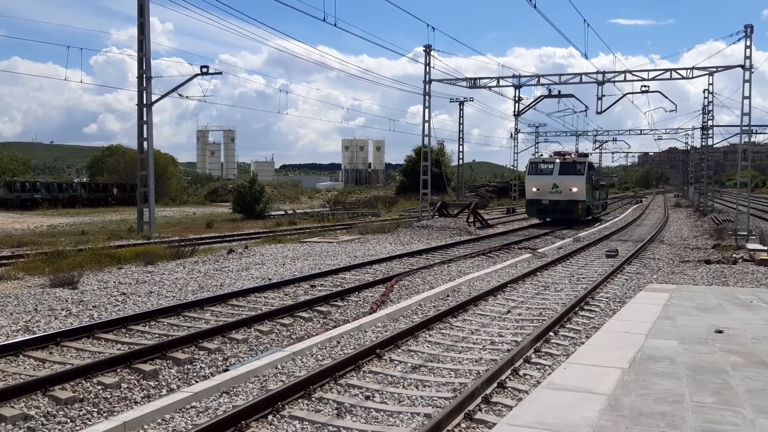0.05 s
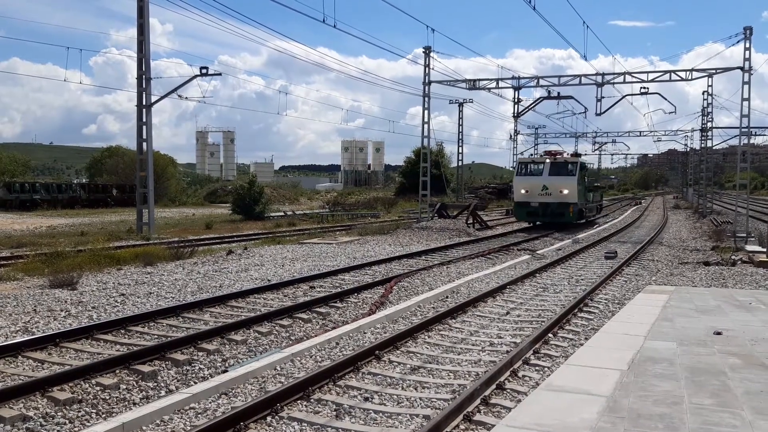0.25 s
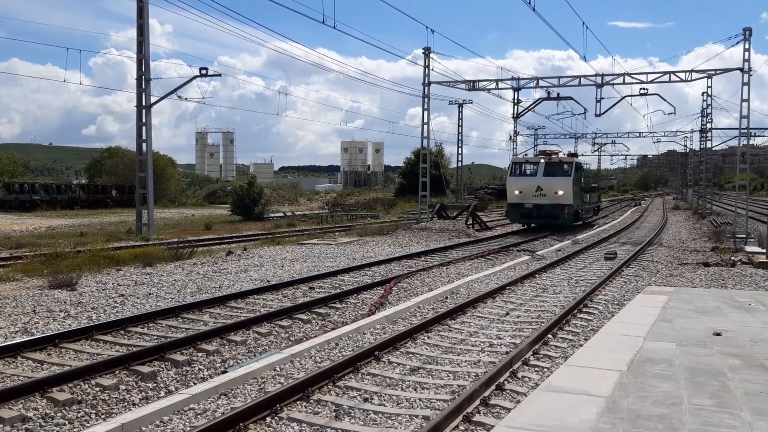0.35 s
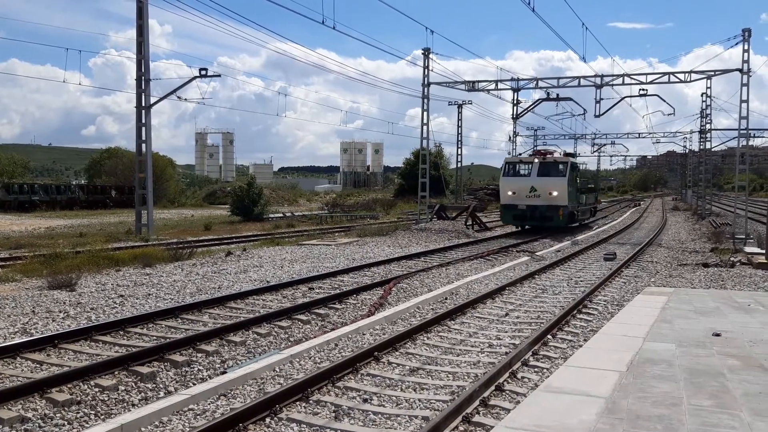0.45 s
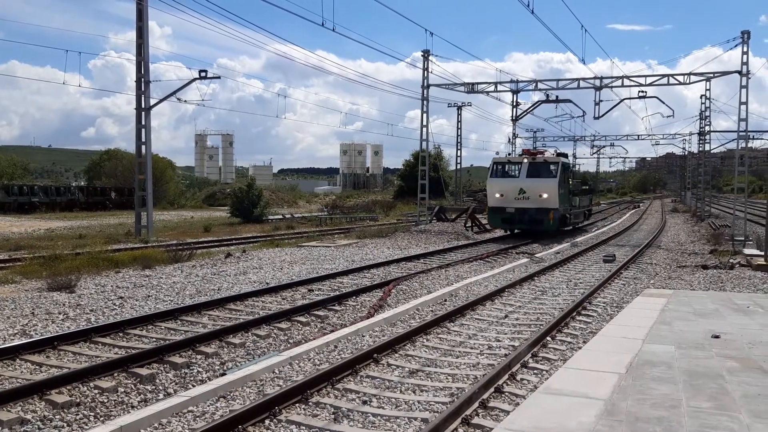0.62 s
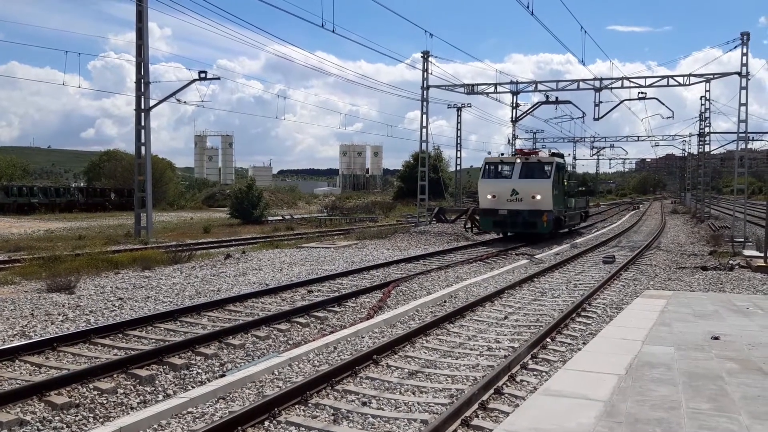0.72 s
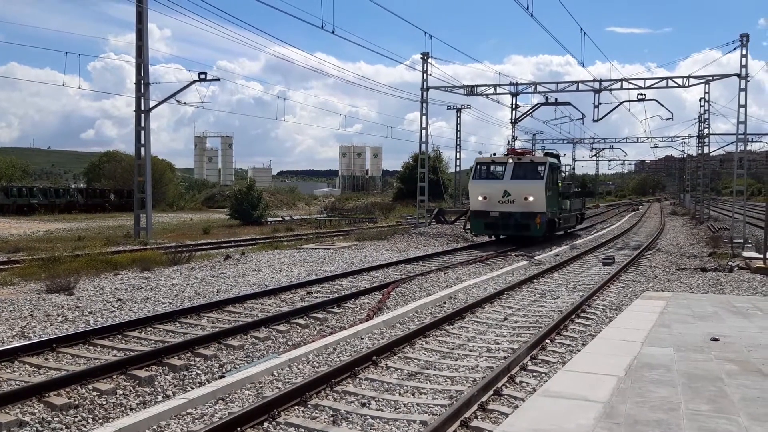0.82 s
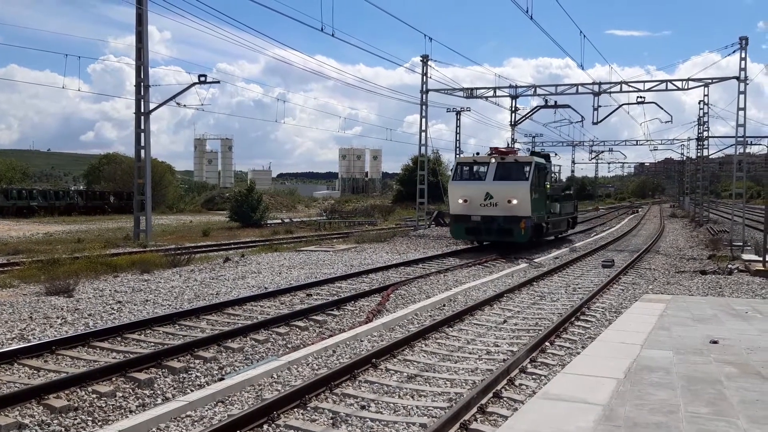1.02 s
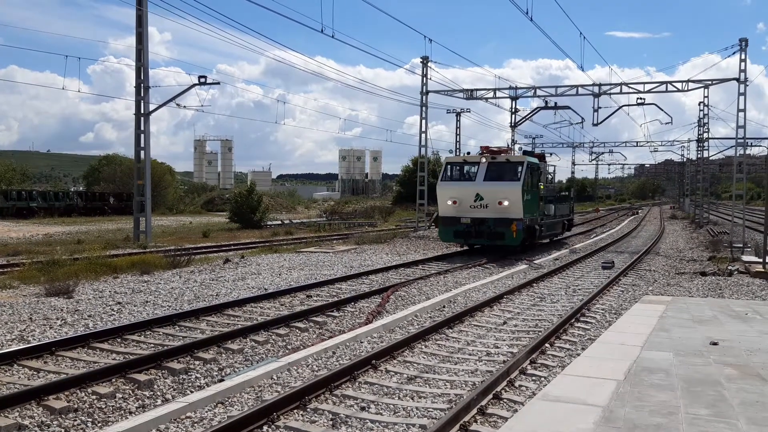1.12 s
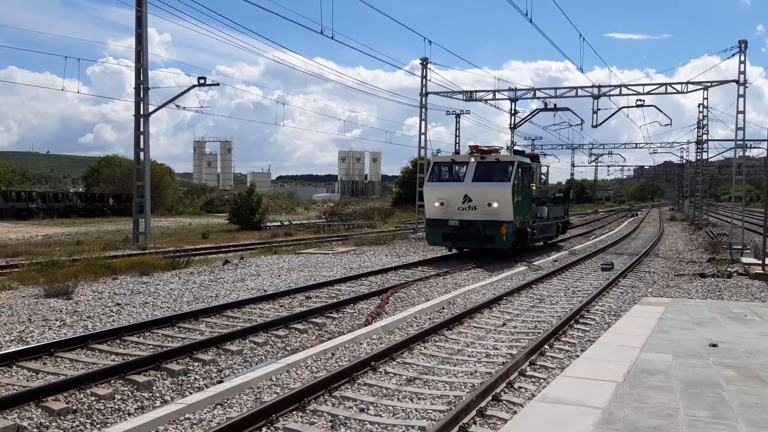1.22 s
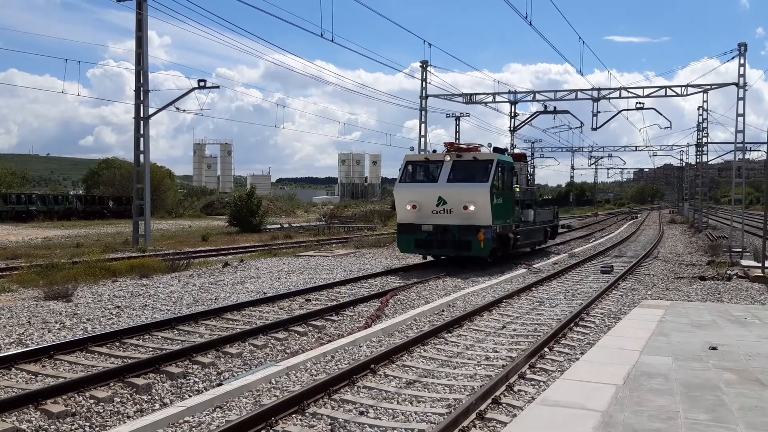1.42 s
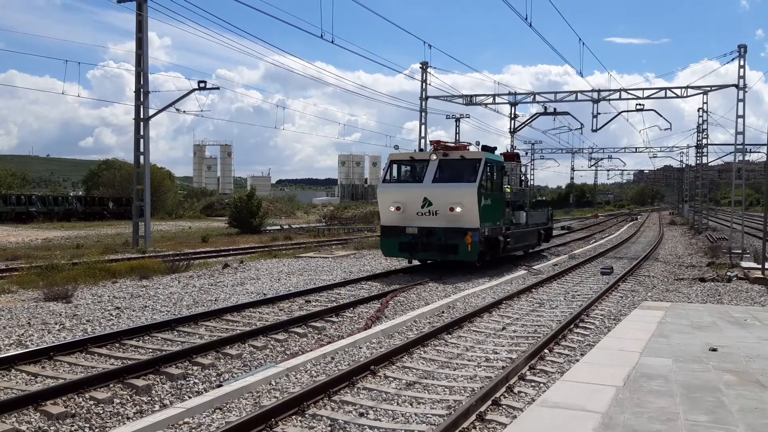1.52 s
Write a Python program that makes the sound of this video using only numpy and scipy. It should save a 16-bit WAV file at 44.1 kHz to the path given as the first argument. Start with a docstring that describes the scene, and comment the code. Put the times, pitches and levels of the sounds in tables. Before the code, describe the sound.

A rail vehicle's air horn gives one loud, high blast from about 0.2 to 0.6 seconds, turning duller as it ends. Its echo fades across the open yard over the following second. Throughout, a faint diesel throb and the hiss of wheels on rails grow slightly as the vehicle approaches. Low wind gusts buffet the microphone, mostly from 0.7 to 1.2 seconds, with a dull bump near 1.1 seconds.

```python
"""One short air-horn blast from a small diesel rail vehicle approaching across an open yard.
The horn turns dull and slightly sharp as its air runs out, and echoes round the yard, where an
earlier blast is still dying away. Behind it the engine throbs and the wheels hiss on the rails.
Gusts buffet the stereo microphone, and the recorder's gain ducks under the horn."""
import sys
import numpy as np
from scipy import signal
from scipy.fft import rfft, irfft
from scipy.io import wavfile
from scipy.ndimage import uniform_filter1d

SR = 44100
rng = np.random.default_rng(int(sys.argv[2]) if len(sys.argv) > 2 else 0)


def persist_wave(psi):
    """Save psi, clipped to +-1, as 16-bit WAV."""
    counts = np.round(np.clip(psi, -1, 1) * 32767).astype(np.int16)
    wavfile.write(sys.argv[1], SR, np.atleast_2d(counts).T)


N = 68355
T = np.arange(N) / SR
BINS_HZ = np.maximum(np.fft.rfftfreq(2 * N, 1 / SR), 1)
ONSET_S = 0.224
BEHIND_PITCH_RATIO = 0.96   # walls behind the vehicle hear it recede


def from_db(db):
    """Decibels to gain."""
    return 10 ** (np.asarray(db) / 20)


def rms_one(x):
    """Scale to unit power."""
    return x / np.sqrt(np.mean(x ** 2) + 1e-20)


def pan(db):
    """Gains that raise the left and lower the right by db."""
    return from_db([[db], [-db]])


def bell(x, centre, half_width):
    """A bell curve over x that peaks at 1."""
    return np.exp(-((x - centre) / half_width) ** 2)


def drift(rate_hz):
    """A random wander with a spread of about 1, mostly slower than rate_hz."""
    spectrum = rfft(rng.standard_normal(2 * N))
    return rms_one(irfft(spectrum / (1 + (BINS_HZ / rate_hz) ** 2)))[:N]


def colour(x, points):
    """Filter by rows of Hz and dB, with one dB column or one for each channel."""
    hz, *columns = np.transpose(points)
    gains = from_db([np.interp(np.log(BINS_HZ), np.log(hz), db) for db in columns])
    return irfft(rfft(x, 2 * N) * gains)[..., :N]


def noise(points, correlation=0):
    """Coloured stereo noise of unit power."""
    mid, side = rng.standard_normal((2, N))
    white = np.sqrt(1 + correlation) * mid + np.sqrt(1 - correlation) * side * [[1], [-1]]
    return rms_one(colour(white, points))


def horn():
    """A diaphragm chops the air: high partials need high pressure; the air hisses with each cycle."""
    # Each row: time in seconds, pitch in Hz.
    pitch = [(.205, 712), (.222, 722), (.232, 719), (.245, 715), (.265, 711.8), (.3, 709.6), (.35, 708.2),
             (.42, 707.5), (.47, 709), (.51, 712), (.545, 716), (.58, 720), (.63, 719)]
    # Each row: time in seconds, air pressure in dB relative to full.
    pressure = [(.198, -29.5), (.211, -5), (.222, -4), (.234, -1.63), (.28, -0.5), (.38, -0.44),
                (.46, -1.8), (.52, -3.5), (.56, -7), (.598, -10.5), (.622, -19), (.655, -30.5), (.72, -100)]
    # Each row: multiple of the pitch, left and right relative level in dB, dB per dB of pressure.
    partials = [(1, -16.5, -10, 0.94), (2, -19.5, -26.5, 2.5), (3, -16, -5.5, 3), (4, -30, -21, 3),
                (5, -26, -26, 2.5), (6, -29, -20.5, 4.5), (7, -26.5, -13.5, 7.5), (8, -28, -17, 5.5),
                (9, -53, -44.5, 1.4), (10, -38.5, -47.5, 3.5), (11, -39, -63, 3.5), (12, -48, -77, 5),
                (13, -52, -58, 4), (14, -47.5, -47.5, 3), (17, -46.5, -35.5, 4), (20, -64, -46, 4.5),
                (21, -61, -54, 1)]
    # Air rushing through the horn. Each row: frequency in Hz, relative level in dB.
    air_spectrum = [(400, -27), (800, -4), (1050, -11), (1300, 0), (1650, -7), (2150, 4), (2500, -9),
                    (3000, -4), (3900, -15), (4600, -2), (5700, -3), (6600, -21), (9500, -34), (13000, -24),
                    (16000, -33)]
    tone_db, air_db, left_lead_s = 2.5, -31, 0.00004
    flutter_hz, dispersion_rad = 164.6, 0.84
    pressure_db = np.interp(T, *np.transpose(pressure), left=-100)
    rasp = bell(T, ONSET_S, 0.028)   # the diaphragm rasps before it settles
    hz = np.interp(T, *np.transpose(pitch)) * (1 + (0.0008 + 0.006 * rasp) * drift(200))
    phase = 2 * np.pi * np.cumsum(hz) / SR
    phases = phase + 2 * np.pi * hz * left_lead_s, phase
    squeal_db = 9 * bell(T, 0.217, 0.034)   # one high partial flashes at the start
    # In the stereo image the blast starts on the left, then settles to the right.
    left_extra_db = 3.5 * bell(np.maximum(T, ONSET_S), ONSET_S, 0.1)
    right_entry = 0.5 + 0.5 * np.tanh((T - 0.228) / 0.0066)
    multiples, *columns = np.transpose(partials)
    tone = np.zeros((2, N))
    for k in range(1, 22):
        left_db, right_db, steepness = [np.interp(k, np.round(multiples), c) for c in columns]
        swell_db = steepness * pressure_db + squeal_db * bell(k * hz, 5750, 600)
        gains = from_db(left_db + left_extra_db), from_db(right_db) * (right_entry if k < 6 else 1)
        turbulence = 1 + 0.029 * min(np.sqrt(k), 2) * drift(61)
        for channel, gain in enumerate(gains):
            waver_db = 3.07 * np.log10(1 + k) * drift(7)
            wave = np.sqrt(2) * np.sin(k * phases[channel] + dispersion_rad * k * k)
            tone[channel] += gain * from_db(swell_db + waver_db) * wave * turbulence
    # A dying flutter puts faint side tones round the partials.
    flutter_depth = 0.082 * np.exp(-np.abs(T - ONSET_S) / 0.14)
    flutter = 1 + flutter_depth * np.sin(2 * np.pi * flutter_hz * T + drift(11))
    air = noise(air_spectrum, correlation=0.49) * (1 + 0.36 * np.cos(phase))
    air *= from_db(air_db + 1.9 * pressure_db + 7 * rasp)
    air[1] *= right_entry
    return from_db(tone_db) * tone * flutter + air * pan(-5)


def from_behind(x, delay_s=0):
    """A mono sound as walls behind the moving vehicle return it, slightly lower in pitch."""
    return np.interp(ONSET_S + (T - delay_s - ONSET_S) * BEHIND_PITCH_RATIO, T, x)


def slaps(blast):
    """Dull single echoes off large surfaces behind the vehicle."""
    # Each row: delay in seconds, left and right gain in dB.
    echoes = [(.045, -24, -14.5), (.105, -40.5, -16.5), (.29, -41, -37)]
    dull = signal.sosfilt(signal.butter(2, 654, fs=SR, output="sos"), blast.mean(axis=0))
    return sum(from_db([[left], [right]]) * from_behind(dull, delay_s) for delay_s, left, right in echoes)


def scatter(x, delay_s, t60_s):
    """A dying swarm of reflections from masts, wagons and buildings."""
    reflections_per_s = 900
    swarm = rng.standard_normal((2, N)) * (rng.random((2, N)) < reflections_per_s / SR)
    swarm *= np.clip((T - delay_s) / 0.027, 0, 1) * from_db(-60 * T / t60_s)
    swarm /= np.sqrt(np.sum(swarm ** 2, axis=1, keepdims=True))
    return signal.fftconvolve(x, swarm, axes=1)[:, :N]


def yard(blast):
    """The yard answers from near and far, and duller and lower from behind the vehicle."""
    # Tone of the echoes. Each row: frequency in Hz, gain in dB.
    echo_colour = [(700, -2.5), (1400, -1.5), (2100, 3), (2800, -1), (3500, -2.5), (4300, -0.5),
                   (5500, -11.5), (9000, -3.5), (15000, -24)]
    reflected = colour(blast, echo_colour)
    lowered = np.array([from_behind(channel) for channel in reflected])
    dull = signal.sosfilt(signal.butter(4, 1160, fs=SR, output="sos"), lowered)
    near = from_db(-17) * scatter(reflected, delay_s=0.034, t60_s=0.41)
    far = from_db(-28.5) * scatter(reflected, delay_s=0.068, t60_s=2.16)
    behind = from_db(-24) * scatter(dull, delay_s=0.071, t60_s=2.2)
    return near + far + behind


def echo_swells():
    """The horn's lowest partial swells briefly in the dying echo."""
    # Each row: peak time and half length in seconds, pitch in Hz, left and right level in dB.
    swells = [(0.641, 0.021, 715, -36.5, -20.5), (0.879, 0.015, 694, -34, -31.5),
              (0.953, 0.044, 690, -43, -39.5)]
    out = np.zeros((2, N))
    for peak_s, half_s, hz, left, right in swells:
        tone = np.sqrt(2) * np.sin(2 * np.pi * (hz * T + rng.random()))
        out += from_db([[left], [right]]) * bell(T, peak_s, half_s) * tone
    return out


def distant_ring():
    """The blurred partials of an earlier blast fade in the distance, a little to the right."""
    # Each row: frequency in Hz, starting level in dB before panning.
    partials = [(710, -41.5), (1417, -57.5), (2114, -50)]
    blur_hz, fade_db_per_s = 9, 11.5
    ring = np.zeros((2, N))
    for hz, db in partials:
        for channel in range(2):
            blur = drift(blur_hz) + 1j * drift(blur_hz)
            ring[channel] += from_db(db) * np.real(blur * np.exp(2j * np.pi * hz * T))
    return ring * from_db(-fade_db_per_s * T) * pan(-2)


def vehicle():
    """Diesel firing, to the left, and wheels on the rails grow louder as they near the microphone."""
    # Weaker engine orders. Each row: frequency in Hz, relative level in dB.
    orders = [(108.5, -57), (145, -57), (181, -59.5), (217.5, -63), (264, -60.5), (362, -61), (434, -60.5),
              (482, -67.5)]
    # Wheels, rails and engine casing. Each row: frequency in Hz, left and right relative level in dB.
    rolling_spectrum = [(30, -40, -33.5), (60, 6, 1), (120, 3.5, -18.5), (270, 5.5, 2), (450, -29, -1.5),
                        (700, -1.5, -4.5), (1133, -25, -17.5), (1250, -9, -8), (1595, -22, -13),
                        (2107, -23, -3.5), (2630, -20, -12.5), (3850, -26, -24), (4460, -26.5, -13.5),
                        (5460, -29.5, -11.5), (6640, -34, -32.5), (8500, -41.5, -58.5), (10000, -51, -49),
                        (12500, -44, -35), (16000, -56, -56)]
    # Swell of the rolling noise. Each row: time in seconds, gain in dB.
    rolling_swell = [(0, 2.5), (.11, 5.5), (.22, 3), (.7, 0.5), (1.0, 1), (1.18, 0), (1.27, 3.5), (1.4, 2),
                     (1.52, 2.5)]
    firing_hz, firing_db, speed_wander, approach_db_per_s = 72.3, -42, 0.0089, 3.5
    engine_time = T + np.cumsum(speed_wander * drift(3.8)) / SR
    engine = np.zeros((2, N))
    for hz, db in [(firing_hz, firing_db)] + orders:
        amplitude = np.sqrt(2) * from_db(db + 0.86 * drift(6.1))
        engine += amplitude * np.sin(2 * np.pi * (hz * engine_time + rng.random()))
    rolling_db = -42.5 + np.interp(T, *np.transpose(rolling_swell)) + drift(25)
    rolling = from_db(rolling_db) * noise(rolling_spectrum, correlation=0.23)
    return (engine * pan(5) + rolling) * from_db(approach_db_per_s * (T - T.mean()))


def wind():
    """Gusts right on the microphone: lumpy low noise, separate at each port."""
    # Each row: peak time and half length in seconds, left and right level in dB.
    gusts = [(0.092, 0.038, -43.5, -43), (0.198, 0.025, -32.5, -68), (0.461, 0.041, -34, -48),
             (0.713, .04, -30.5, -35.5), (0.793, 0.053, -33, -38.5), (0.832, 0.0082, -36, -27),
             (0.901, .035, -30, -40), (1.028, 0.035, -23.5, -47), (1.133, 0.026, -35, -27.5),
             (1.168, 0.012, -24.5, -34)]
    # Each row: frequency in Hz, relative level in dB.
    spectrum = [(25, -53), (45, -11), (70, 2), (110, 6.5), (180, -4), (280, 0), (450, -10), (800, -18.5),
                (1500, -59), (4000, -82)]
    power = sum(from_db([[left], [right]]) ** 2 * bell(T, peak_s, half_s)
                for peak_s, half_s, left, right in gusts)
    rumble = np.sqrt(power) * noise(spectrum)
    lumps_db = 1.8 * np.array([drift(50), drift(50)])
    return rumble * from_db(lumps_db)


def wind_thump():
    """One brief, dull buffet on both sides of the microphone."""
    # Each row: frequency in Hz, relative level in dB.
    spectrum = [(60, -30), (170, -3), (280, 13), (450, 7), (780, -5.5), (1100, -23), (3000, -48),
                (8000, -85)]
    return from_db(-24) * bell(T, 1.146, 0.0093) * noise(spectrum, correlation=0.25)


def scene():
    """What reaches the microphone in the yard: horn, echoes, vehicle and wind."""
    blast = horn()
    echoes = slaps(blast) + yard(blast) + distant_ring()
    return blast + echoes + vehicle() + wind() + wind_thump() + echo_swells()


def record(dry):
    """The recorder's gain ducks under loud sound and recovers steadily; the top treble is cut."""
    limit_db, attack_s, release_db_per_s, cutoff_hz = -9.5, 0.002, 21, 15850
    power = uniform_filter1d(np.mean(dry ** 2, axis=0), size=256)
    excess_db = np.maximum(10 * np.log10(np.maximum(power, 1e-12)) - limit_db, 0)
    release_db = release_db_per_s * T
    duck_db = np.maximum.accumulate(excess_db + release_db) - release_db
    pole = np.exp(-1 / (attack_s * SR))
    limited = dry * from_db(-signal.lfilter([1 - pole], [1, -pole], duck_db))
    return signal.sosfilt(signal.ellip(10, 0.2, 80, cutoff_hz, fs=SR, output="sos"), limited)


dry = scene()
out = record(dry)
persist_wave(out)
```